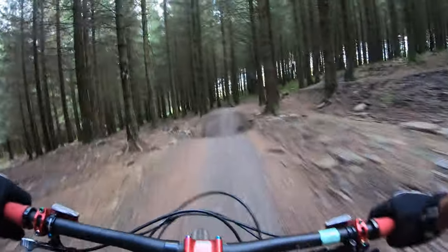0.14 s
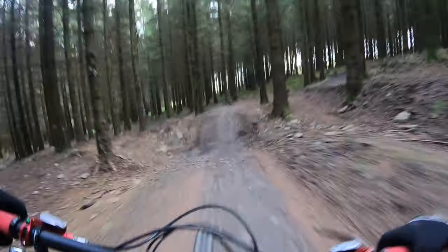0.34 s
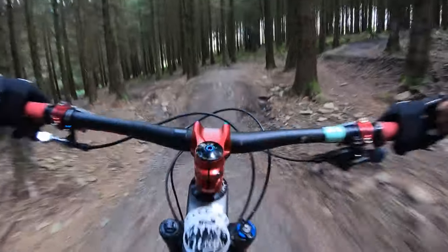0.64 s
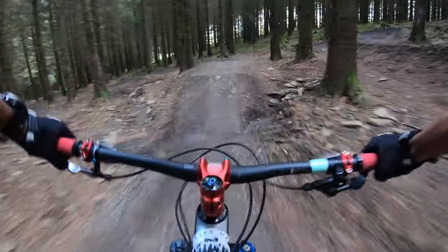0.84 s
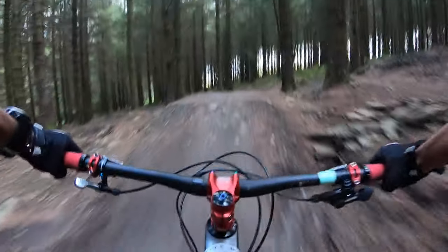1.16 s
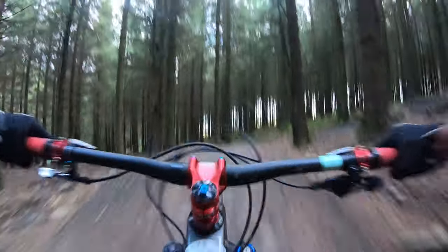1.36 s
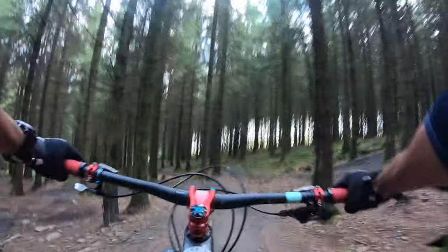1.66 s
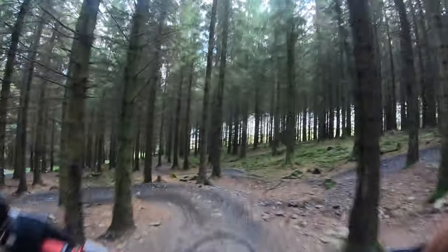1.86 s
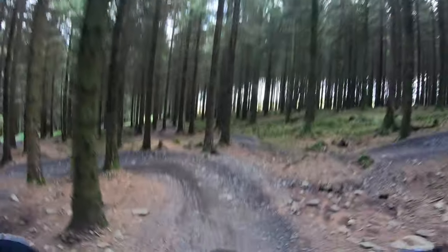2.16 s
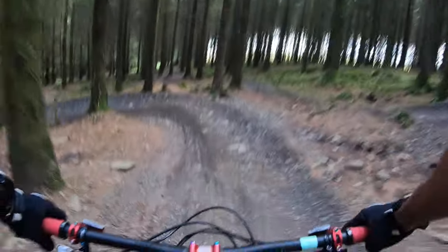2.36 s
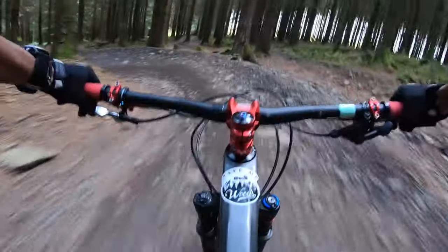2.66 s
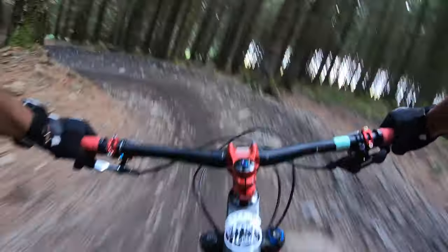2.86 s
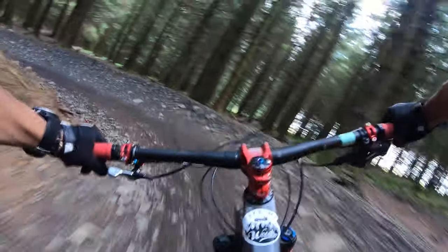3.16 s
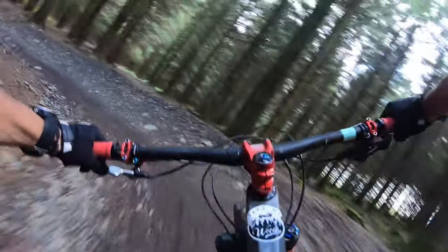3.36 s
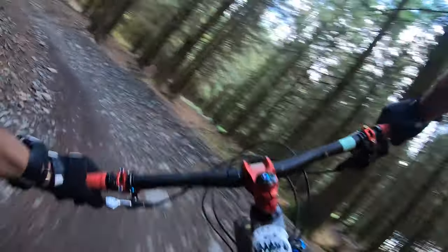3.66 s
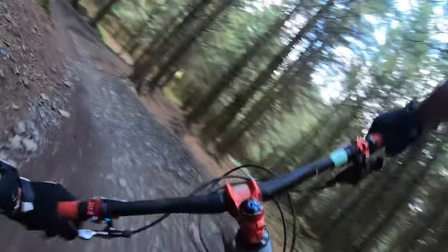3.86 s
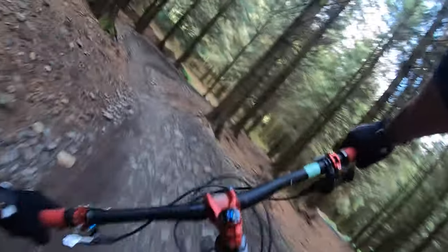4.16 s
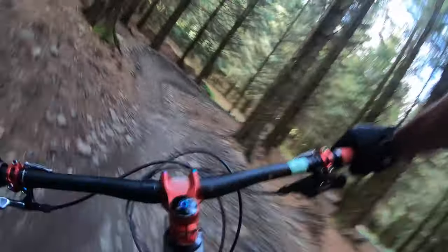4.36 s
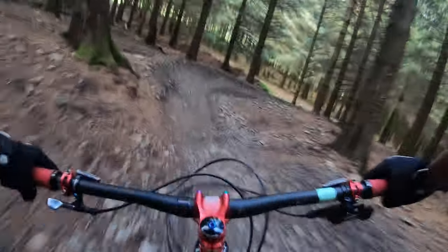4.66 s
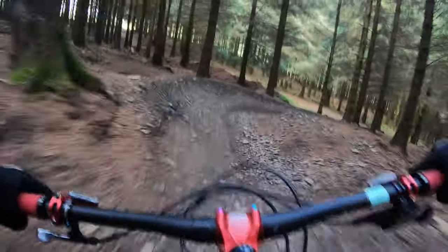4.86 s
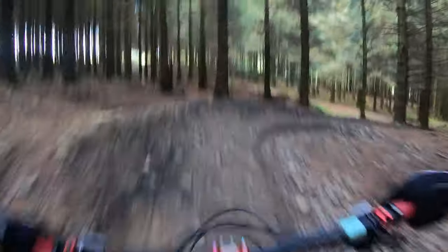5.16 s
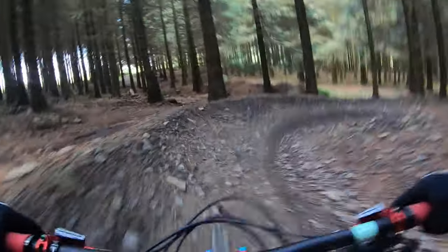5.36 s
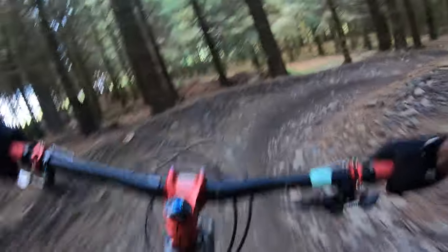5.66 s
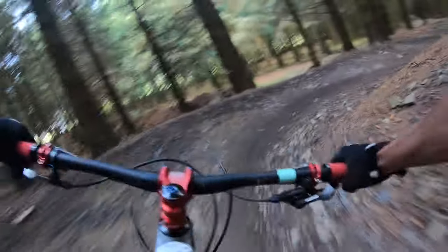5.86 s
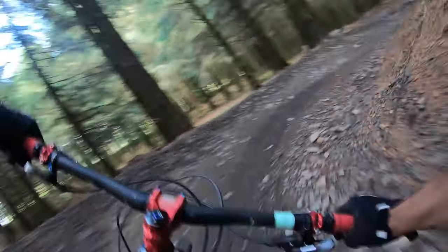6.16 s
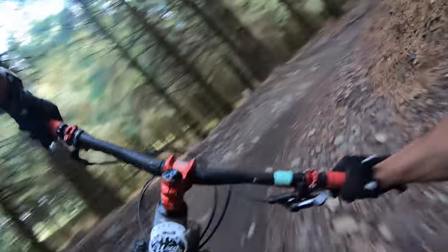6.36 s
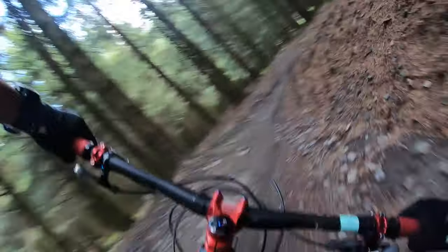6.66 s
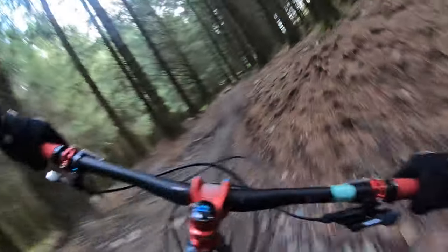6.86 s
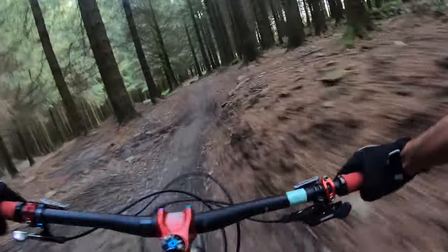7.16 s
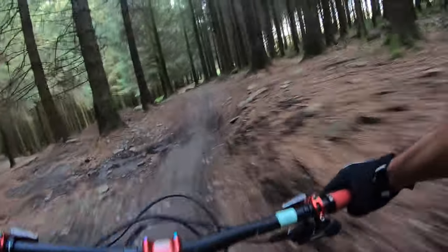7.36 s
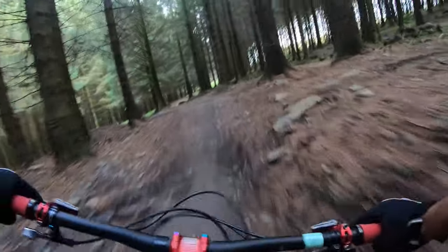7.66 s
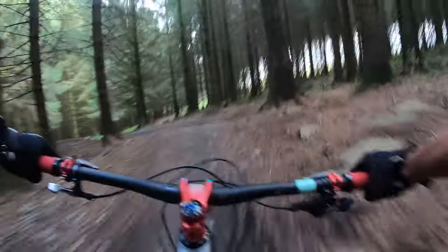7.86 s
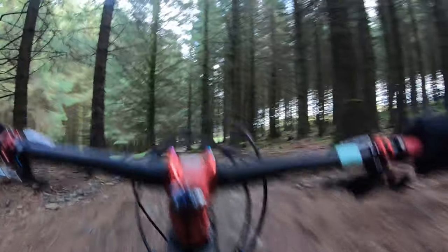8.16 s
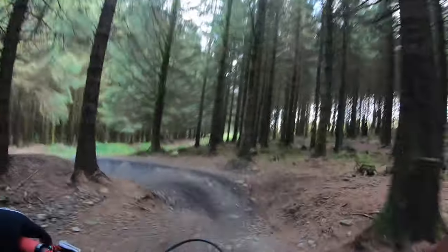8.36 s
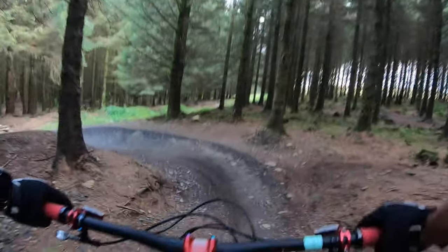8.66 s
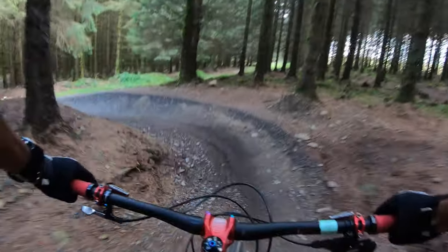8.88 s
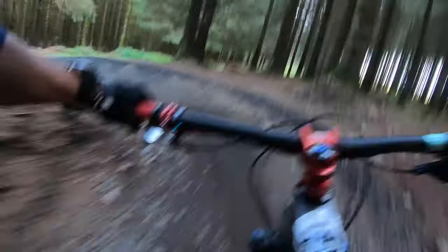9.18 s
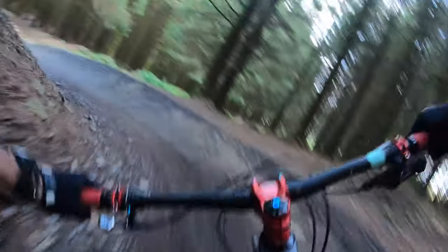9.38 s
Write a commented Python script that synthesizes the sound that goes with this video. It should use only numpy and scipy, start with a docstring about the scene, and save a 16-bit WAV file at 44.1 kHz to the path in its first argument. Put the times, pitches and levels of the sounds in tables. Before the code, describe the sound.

A mountain bike coasts down a stony forest trail, heard from the rider's chest. Tyres hum and crunch, the freehub buzzes, the chain rattles and flung stones crack against the frame. The tyres go quiet over a jump, then land with a thump, followed by thin, high brake squeaks. A rougher stretch of knocks leads to two more jumps and a hard landing. Wind buffets the microphone throughout.

```python
"""On a stony trail, a mountain bike coasts downhill, heard from a camera on the rider's chest.
The tyres hum and crunch gravel, and go quieter over jumps. Bumps knock the frame and rattle the chain,
flung stones crack against the bike and thin metal rings on. The freehub (the rear wheel's ratchet)
buzzes, and before a bend a brake disc squeaks each time a cut-out passes the pads.
Wind buffets the microphone all the way."""
import sys
import numpy as np
from scipy import signal
from scipy.io import wavfile
from scipy.ndimage import uniform_filter1d

SR = 44100
rng = np.random.default_rng(int(sys.argv[2]) if len(sys.argv) > 2 else 0)


def wrap_up_sound(samples):
    """Save the sound to the file named by the first command line argument, as 16-bit audio."""
    columns = np.atleast_2d(samples).T
    # keep every value between -1 and 1, then stretch to whole-number steps
    tamed = np.clip(columns, -1, 1)
    steps = np.round(tamed * 32767).astype(np.int16)
    wavfile.write(sys.argv[1], SR, steps)


N = 419832

# The trail under the tyres (time [s], tyre load [dB], loose gravel [dB])
TRAIL = [(0, -25.5, -29.5), (.18, -21.5, -28.5), (.45, -27, -33), (.64, -29, -32), (.75, -33.5, -34.5),
         (1.03, -25, -30), (1.22, -16.5, -25), (1.35, -17, -25.5), (1.51, -15, -22), (1.65, -22.5, -26.5),
         (2.54, -20.5, -19), (2.68, -16, -24), (2.82, -20, -26), (2.9, -32.5, -30.5), (3.0, -25.5, -31),
         (3.2, -27, -29), (3.35, -19.5, -30), (3.47, -26.5, -30), (3.56, -20, -28.5), (3.68, -28, -31),
         (3.85, -19.5, -30), (3.98, -21.5, -31), (4.05, -23, -25), (4.11, -22.5, -32), (4.17, -30.5, -31.5),
         (4.32, -20.5, -32.5), (4.6, -23.5, -32.5), (4.85, -26.5, -32.5), (5.0, -28, -33.5),
         (5.27, -18.5, -24), (5.36, -20.5, -27), (5.45, -20, -27), (5.72, -22, -29.5), (5.8, -21, -28),
         (5.87, -26, -31.5), (6.0, -22, -27.5), (6.1, -18.5, -29.5), (6.2, -18, -24.5), (6.3, -17, -27.5),
         (6.4, -19.5, -29.5), (6.48, -22, -31.5), (6.58, -24, -29), (6.7, -21, -28.5), (7.22, -27, -31.5),
         (7.4, -18, -27.5), (7.7, -26.5, -29.5), (7.8, -26, -31.5), (7.97, -30, -35), (8.1, -23.5, -31.5),
         (8.4, -28.5, -31.5), (9.1, -20, -20), (9.3, -22.5, -31), (9.52, -17, -30)]
# Packed or stony ground (time [s], tyre air ring [Hz], ring over load [dB], grit over gravel [dB])
SURFACE = [(0, 266, -1, -9), (.2, 271, 6, -15), (.45, 276, 2, -15), (.8, 272, 6.5, -7),
           (1.2, 267, -1.5, -12), (1.35, 279.5, -6.5, -17), (1.55, 271.5, 0, -17.5), (2.7, 268.4, 0, -11),
           (2.88, 254, 7.5, -9), (3.05, 279, 2, -8.5), (3.3, 265, 4, -7.5), (3.6, 264, -1, -7),
           (3.93, 274, 0.5, -8), (4.03, 266, 0, -5.5), (4.3, 262, 0.5, -17), (5.0, 268, 2.5, -8),
           (5.33, 270, -3, -8.5), (5.45, 259, -6, -12.5), (5.83, 270, 0, -6), (6.15, 267, -8.5, -10.5),
           (6.4, 268, 1, -7), (6.8, 253.6, 4.5, -7), (7.35, 262, -9.5, -11), (7.8, 255, 7.5, -6.5),
           (8.3, 252, 4.5, -8), (9.2, 275, -0.5, -12.5), (9.52, 268, -10, -4.5)]
# More tyre tones
# (time [s], tread whir [Hz], whir over gravel [dB], upper ring over load [dB], drumming over load [dB])
TYRE_TONES = [(0, 1080, -16, -4, -24), (.3, 1140, -7, -6, -24), (.6, 1170, -15, -5, -13),
              (.75, 915, -20, -11, -18), (.9, 920, -7.5, -10, -11), (1.2, 990, -13, -8.5, -21),
              (1.6, 990, -18, -12, -25), (2.4, 960, -4, 2, -7), (2.6, 940, -27, -13, -7.5),
              (2.9, 830, -10, -11, -12), (3.2, 820, -12, -11, -26), (3.7, 865, -14, -7, -8),
              (4.1, 930, -15, -19, -5), (4.7, 825, -14, -9.5, -8.5), (5.2, 1020, -18, -12, -8),
              (5.7, 870, -25, -12.5, -13), (6.2, 880, -12, -13, -15), (6.7, 810, -14, -10, -2.5),
              (7.3, 950, -24, -15, -12.5), (7.9, 910, -12, -6, -7.5), (8.4, 950, -13, -4.5, -5),
              (9.2, 950, -32, -8, -11), (9.52, 920, -14, -22, -16)]
# Wheels off the ground (lift-off [s], landing [s], change in tyre noise [dB])
JUMPS = [(1.63, 2.578, -22), (6.79, 7.23, -8.5), (8.407, 9.148, -18)]
# The low roar of rolling (frequency [Hz], level [dB])
ROAR_SPECTRUM = [(90, -16), (160, -25.5), (220, -2.5), (330, 9), (420, -4), (600, -6.5), (1000, -61.5)]
# Crunching gravel (frequency [Hz], level [dB])
GRAVEL_SPECTRUM = [(400, -1), (700, -1.5), (950, -7), (1250, -6), (1700, -6), (2100, -5), (2900, -7.5),
                   (4000, -28.5), (6000, -36.5)]
# Fine, crackling grit (frequency [Hz], level [dB])
GRIT_SPECTRUM = [(2200, -7), (3100, 8.5), (3900, 8.5), (4700, 4.5), (5700, 0), (6150, -7), (8400, -6),
                 (9500, -14.5), (11000, -7), (15500, -4)]
# Tyre and fork take a blow (time [s], level [dB], pitch [Hz], base time to fade by 60 dB [s])
THUMPS = [(.746, -42, 275, .047), (2.532, -8.5, 290, 0.066), (2.55, -6, 177, 0.044),
          (2.917, -10.5, 276, 0.068), (3.846, -8, 262, 0.11), (3.938, -5, 300, 0.031),
          (4.053, -9.5, 276, 0.069), (4.184, -8.5, 320, 0.09), (5.01, -8.5, 290, 0.063),
          (5.087, -6.5, 215, 0.054), (5.193, 1.5, 284, 0.035), (5.391, -6, 228, 0.042),
          (5.924, -10, 285, 0.024), (5.978, 1.5, 258, 0.017), (6.124, -3.5, 336, 0.046),
          (6.147, -11, 273, 0.086), (6.18, -5.5, 268, 0.069), (6.224, 0, 260, 0.025),
          (6.662, -4, 250, 0.032), (7.228, -10.5, 262, 0.041), (8.305, -12, 314, 0.057),
          (9.097, -20, 363, 0.042), (9.121, 1, 228, 0.018)]
# Chain, cables and frame clack (time [s], level [dB], pitch [Hz])
CLACKS = [(0.304, -24, 2350), (.472, -28, 1160), (.704, -26, 2700), (0.854, -28, 2400), (1.053, -28, 920),
          (1.167, -20.5, 1680), (1.209, -16.5, 930), (1.215, -13.5, 2550), (1.342, -18, 1570),
          (1.57, -29, 2240), (1.641, -20, 2600), (1.669, -24.5, 1710), (1.78, -24, 2250), (2.201, -22, 780),
          (2.327, -24, 920), (2.535, -15.5, 1100), (2.551, -13, 1550), (2.594, -9.5, 2430),
          (2.627, -14.5, 2470), (2.919, -20, 800), (2.921, -17, 1910), (2.953, -16, 1560),
          (2.978, -16.5, 1630), (3.05, -19.5, 784), (3.083, -23, 1470), (3.148, -19, 1910),
          (3.215, -16, 834), (3.215, -16.5, 1860), (3.262, -30, 1730), (3.328, -28, 1720),
          (3.396, -25, 1640), (3.488, -31, 1690), (3.702, -24, 1840), (3.836, -31, 816), (3.881, -22, 1710),
          (3.989, -26, 1360), (4.021, -16, 990), (4.039, -18, 1420), (4.076, -15.5, 1590),
          (4.123, -25, 1700), (4.281, -26, 1490), (4.356, -35, 1540), (4.406, -20, 1520),
          (4.491, -29, 1630), (4.665, -28, 1690), (4.788, -20.5, 720), (4.785, -18, 1670),
          (4.823, -23, 2140), (4.99, -27, 2480), (5.048, -20, 2000), (5.089, -21, 1760), (5.152, -17, 1500),
          (5.194, -19, 1440), (5.226, -21, 1370), (5.243, -15, 2080), (5.269, -13.5, 1710),
          (5.287, -16.5, 1245), (5.311, -13, 2460), (5.333, -16, 1640), (5.412, -28, 1250),
          (5.435, -18, 1010), (5.464, -31, 1650), (5.474, -17, 1690), (5.494, -19, 2500),
          (5.538, -19, 2590), (5.566, -17, 2530), (5.625, -20, 1750), (5.713, -19, 2260),
          (5.734, -20, 2310), (5.786, -17, 1670), (5.83, -13.5, 2460), (5.884, -31, 2540),
          (5.928, -9.5, 2374), (5.962, -14, 2330), (6.024, -16, 2240), (6.074, -19, 2400),
          (6.089, -16.5, 2220), (6.125, -10, 2140), (6.18, -21, 2150), (6.239, -16, 685),
          (6.239, -16, 2120), (6.313, -25, 1560), (6.525, -23, 2100), (6.594, -17.5, 2170),
          (6.718, -15.5, 660), (6.853, -25, 2960), (7.229, -17.5, 780), (7.337, -20, 1810),
          (7.358, -19, 2280), (7.391, -14, 950), (7.55, -19, 890), (7.666, -15.5, 650), (7.666, -18, 2460),
          (7.761, -20, 1000), (8.184, -19.5, 2420), (8.221, -20.5, 2420), (8.428, -22.5, 2880),
          (9.096, -29, 2430), (9.121, -16, 915), (9.138, -9.5, 2790), (9.153, -14, 2520),
          (9.156, -15, 1750), (9.252, -29, 1780), (9.293, -18, 1630), (9.384, -32, 1620)]
# Stones hit frame and wheels (time [s], crack level [dB], crack pitch [Hz], knock level [dB])
STONE_HITS = [(.5386, -38, 5000, -40), (.6433, -35, 5400, -38), (.8149, -36, 5020, -41),
              (0.856, -31, 5800, -40), (.9551, -32, 5770, -40), (1.025, -36, 4550, -41),
              (1.078, -29, 5540, -36), (1.0899, -24, 6600, -24), (1.1248, -27, 5800, -42),
              (1.1861, -33, 5600, -38), (1.2145, -32, 7500, -31), (1.3148, -32, 5400, -28),
              (1.3389, -20, 5720, -36), (1.4111, -36, 5340, -40), (1.6347, -28, 5470, -31),
              (1.7804, -48, 5300, -32), (2.5575, -30, 4600, -33), (2.5691, -29, 5220, -38),
              (2.596, -26, 5700, -24), (2.6249, -23, 5400, -18), (2.6494, -19, 7500, -38),
              (2.9204, -29, 5050, -24), (2.9397, -30, 5470, -32), (3.0928, -33, 5210, -36),
              (3.1702, -29, 5800, -30), (3.2154, -34, 5570, -33), (3.5098, -35, 4600, -36),
              (3.7329, -31, 6020, -30), (3.8754, -29, 5310, -35), (3.9209, -29, 4910, -32),
              (3.9686, -19, 8700, -44), (4.025, -21, 8270, -29), (4.031, -18, 5750, -18),
              (4.0547, -21, 5780, -23), (4.0766, -25, 5880, -21), (4.0886, -21, 8300, -38),
              (4.1215, -28, 5680, -33), (4.2098, -29, 5700, -30), (4.2557, -44, 5150, -39),
              (4.2964, -37, 8500, -29), (4.3166, -31, 5840, -27.5), (4.3545, -43, 5410, -35),
              (4.4052, -39, 5000, -32), (4.4367, -29, 5500, -29), (4.4623, -36, 5580, -32),
              (4.49, -30, 7800, -34), (4.5077, -30, 5180, -39), (4.5511, -38, 5210, -46),
              (4.6846, -37, 5330, -42), (4.784, -35, 6000, -19), (4.8219, -31, 5140, -36),
              (4.8474, -34, 5380, -41), (4.9495, -35, 4600, -36), (5.032, -24, 5300, -28),
              (5.0494, -36, 5090, -24), (5.0955, -25.5, 5570, -40), (5.1514, -38, 5370, -30),
              (5.175, -26, 5450, -33), (5.216, -36, 9300, -43), (5.2264, -32, 4790, -33),
              (5.2465, -17, 5500, -27), (5.278, -21, 5040, -22), (5.3132, -19, 5000, -26),
              (5.3284, -20, 5450, -21), (5.3502, -25, 5280, -42), (5.4136, -20.5, 5600, -28),
              (5.457, -23, 5140, -32), (5.4734, -24, 5010, -27), (5.5148, -26, 4940, -26),
              (5.5296, -26, 5940, -35), (5.7188, -32, 4660, -25), (5.7838, -37, 5160, -35),
              (5.826, -39, 5360, -20), (5.8774, -33, 4920, -36), (5.9025, -29, 5730, -27),
              (5.928, -40, 5110, -28), (5.961, -41, 5180, -34), (5.9953, -30, 5540, -27),
              (6.0241, -33, 4600, -30), (6.0377, -22, 5360, -22), (6.065, -29, 4860, -34),
              (6.1355, -39, 5740, -24), (6.1814, -25, 5220, -21), (6.2133, -27, 5820, -32),
              (6.2397, -29, 5350, -20), (6.254, -30, 5400, -30), (6.3284, -35, 4850, -25),
              (6.3726, -39, 5500, -26), (6.5934, -28, 5590, -22), (6.6243, -29, 5700, -24),
              (6.6846, -35, 4900, -31), (6.7186, -44, 5000, -21), (6.8518, -42, 5050, -30),
              (7.0533, -40, 4760, -38), (7.252, -29, 5500, -31), (7.3047, -36, 4640, -39),
              (7.3587, -27, 5560, -29), (7.391, -32, 4600, -32), (7.5496, -27, 4820, -29),
              (7.594, -33, 4610, -36), (7.666, -43, 5000, -21), (8.1248, -33, 5240, -36),
              (8.1538, -32, 5420, -36), (8.1836, -19, 5980, -38), (8.2212, -27, 5640, -35),
              (8.268, -36, 8000, -38), (9.1172, -32, 5470, -35), (9.137, -20, 7040, -17),
              (9.183, -29, 5050, -24), (9.2089, -26, 4600, -22), (9.2518, -36, 4600, -28)]
# The crack of a stone (frequency [Hz], level [dB])
CRACK_SPECTRUM = [(3000, -31), (5200, 1), (5800, -10), (7000, -11), (9300, 5), (11000, -2), (15500, 7.5)]
# How loudly the freehub buzzes (time [s], level [dB])
HUB_LEVELS = [(0, -34), (.4, -41.5), (.85, -35.5), (1.5, -32), (1.7, -35.5), (1.76, -44), (1.85, -37.5),
              (1.95, -40), (2.07, -42), (2.2, -40.5), (2.28, -38), (2.4, -35.5), (2.46, -34), (2.54, -34),
              (2.6, -29), (2.69, -26), (2.75, -38), (2.85, -43), (3.6, -62), (4.4, -59), (5.05, -32),
              (5.2, -48), (5.32, -36), (5.4, -48), (5.6, -40), (5.8, -35), (5.87, -36), (5.95, -29),
              (6.1, -37), (6.22, -37), (6.42, -34), (6.5, -53), (6.75, -33.5), (7.0, -43.5), (7.65, -35.5),
              (8.25, -36), (8.52, -40), (8.65, -45), (8.7, -37), (8.78, -39), (8.81, -32), (8.87, -35),
              (8.94, -31.5), (9.0, -34), (9.03, -43), (9.09, -30), (9.52, -41)]
# The tones of the hub's shell (base pitch [Hz], width [Hz], level [dB])
HUB_TONES = [(1780, 600, -10.5), (2500, 210, 6.5), (2910, 37, 1), (4700, 890, -25)]
# The second shell tone drifts, and the others move with it (time [s], pitch [Hz])
HUB_PITCH = [(0, 2520), (1.7, 2510), (2.0, 2520), (2.2, 2660), (2.4, 2560), (2.55, 2420), (2.75, 2440),
             (5.0, 2480), (5.95, 2450), (6.05, 2280), (6.2, 2180), (6.45, 2100), (6.6, 2450), (7.0, 2560),
             (8.3, 2470), (8.6, 2660), (8.8, 2530), (9.0, 2560), (9.1, 2530), (9.52, 2460)]
# Brake squeaks (time [s], level [dB])
SQUEAKS = [(2.646, -30), (2.674, -31), (2.715, -29), (2.751, -26), (2.793, -29), (2.834, -26), (2.872, -27),
           (2.917, -32), (3.001, -45), (3.03, -39), (3.078, -46), (3.114, -48), (3.148, -41), (3.19, -35),
           (3.23, -38), (3.27, -37), (3.311, -31), (3.349, -25), (3.39, -34), (3.431, -29), (3.474, -29),
           (3.515, -34), (3.563, -27), (3.601, -22.5), (3.652, -23.5), (3.704, -21.5), (3.753, -34),
           (3.774, -44), (3.796, -45)]
# The high tones of the brake disc (base pitch [Hz], width [Hz], level [dB])
DISC_TONES = [(12420, 580, 3.5), (12060, 500, -6)]
# Thin metal rings on after a knock (time [s], pitch [Hz], level [dB], time to fade by 60 dB [s])
SPOKE_RINGS = [(1.34, 9220, -50, .9), (1.34, 5700, -52, .9), (3.955, 9250, -45, 0.84),
               (4.03, 5630, -46, 1.6), (4.09, 9600, -63, 1.5), (4.21, 5650, -53, 1.2),
               (4.32, 5660, -53, 1.1), (4.44, 9400, -56, 1.2), (5.22, 9250, -49, 1.5),
               (5.32, 9250, -57, 1.5), (5.53, 9250, -58, 1.2), (5.76, 9250, -58, .6)]
# Gusts on the microphone (time [s], level [dB])
GUST_LEVELS = [(0, -27), (.64, -32), (.85, -21.5), (1.25, -28), (1.7, -22), (1.9, -28.5), (2.03, -32),
               (2.15, -38), (2.35, -32), (2.62, -27), (3.45, -28.5), (4.0, -29.5), (4.9, -29), (5.2, -28),
               (5.45, -23), (5.7, -26), (5.83, -25), (5.99, -34), (6.08, -20), (6.13, -20), (6.2, -21.5),
               (6.5, -28.5), (7.16, -33.5), (7.35, -27.5), (7.9, -31.5), (8.15, -30), (8.48, -30),
               (8.6, -34.5), (8.9, -32.5), (9.07, -36), (9.13, -15.5), (9.25, -29), (9.52, -29)]
# The rumble of those gusts (frequency [Hz], level [dB])
GUST_SPECTRUM = [(15, 3.5), (30, 2.5), (64, -4.5), (110, -10.5), (230, -13.5), (500, -60), (1200, -67)]
# Air rushing past the rider (frequency [Hz], level [dB])
RUSH_SPECTRUM = [(350, -33.5), (600, 5.5), (1400, -10.5), (3700, -6), (5600, -13.5), (6100, -20),
                 (10500, -22.5), (12000, -25.5), (15600, -29)]
# The camera case dulls the bike's treble (frequency [Hz], gain [dB])
CASE_FILTER = [(15, 0.5), (10000, -3.5), (11200, -15), (15500, -23.5)]
# Sound that is unlike at the left and right microphone openings (frequency [Hz], gain [dB])
STEREO_FILTER = [(8000, -72), (10600, -49), (11600, -0.5), (15500, 3)]


def tyre_hum(bumps):
    """Bumps shake the air inside the tyres: it rings and roars, while fork and frame drum below."""
    load_db, jump_db = curves(TRAIL)[0], airborne()
    ring_hz, ring_db, _ = curves(SURFACE)
    _, _, upper_db, drum_db = curves(TYRE_TONES)
    ruts = wobble(24)
    shake = bursts(per_s=120, spread_db=3.5, fade_s=0.0067, hiss=4.2)
    ring = band(shake, ring_hz, 26.3, 165) * gain(ring_db + 0.1 * bumps + 0.29 * ruts)
    upper_ring = band(shake, 1.394 * ring_hz, 39, 170) * gain(upper_db)
    roar = unit_level(filtered(shake, ROAR_SPECTRUM)) * gain(-4.5 + 1.3 * bumps + 1.8 * ruts)
    drum = band(shake, 177.6, 33.5, 33.5) * gain(drum_db)
    hum = (ring + upper_ring) * gain(load_db + jump_db)
    return hum + (roar + drum) * gain(load_db + 0.76 * jump_db)  # these two drop less in a jump


def gravel_crunch(bumps):
    """The tread whirs as its knobs crush gravel and grit, louder on each bump."""
    loose_db, grit_db, jump_db = curves(TRAIL)[1], curves(SURFACE)[2], airborne()
    whir_hz, whir_db, _, _ = curves(TYRE_TONES)
    crunch = bursts(per_s=240, spread_db=1.5, fade_s=0.028, hiss=1.26)
    crackle = bursts(per_s=270, spread_db=5, fade_s=0.0037, hiss=6)
    gravel = unit_level(filtered(crunch, GRAVEL_SPECTRUM))
    whir = band(crunch, whir_hz, 170, 360) * gain(whir_db)
    grit = unit_level(filtered(crackle, GRIT_SPECTRUM))
    patches = wobble(32)  # loose and packed ground take turns
    grit *= gain(loose_db + 0.68 * jump_db + grit_db + 1.7 * bumps + 0.67 * patches)
    return (gravel + whir) * gain(loose_db + jump_db + 1.42 * bumps + 0.14 * patches) + grit


def knocks(rows, tones, noise_share, noise_width, rise_s):
    """A struck part rings and gives a puff of noise. Tones are (pitch multiple, level [dB])."""
    out, t = np.zeros(N + SR), np.arange(SR // 5) / SR
    mean_hz = np.mean(rows, 0)[2]
    for time, db, hz, fade_s in rows:
        ring = sum(gain(tone_db) * np.sin(2 * np.pi * hz * ratio * t) for ratio, tone_db in tones)
        puff = band(rng.standard_normal(len(t)), hz, noise_width * hz, 1.96 * noise_width * hz)
        stretch = (mean_hz / hz) ** 0.038  # lower parts start and die more slowly
        fade_db = -60 * t / (fade_s * stretch)
        rise = 1 - np.exp(-t / (rise_s * stretch ** 2))
        puff = shaped(puff, gain(fade_db / 2.18))  # the noise outlasts the ring
        knock = (1 - noise_share) * ring * gain(fade_db) + noise_share * puff
        add_at(out, time, gain(db) * rise * knock)
    return out[:N]


def stones():
    """Each flung stone gives a sharp crack, with a duller knock from the tube it hits."""
    at = np.flatnonzero(rng.random(N) < 3 / SR)  # about 3 extra pebbles a second
    size_db = 3.5 * rng.standard_normal((N, 2))[at]
    loose_db = (curves(TRAIL)[1] + airborne())[at]
    pebble_hz = rng.uniform(5000, 9500, N)[at]
    pebbles = np.c_[at / SR, loose_db - 25 + size_db[:, 0], pebble_hz, loose_db - 3 + size_db[:, 1]]
    out, t = np.zeros(N + SR), np.arange(3000) / SR
    for time, crack_db, hz, knock_db in [*STONE_HITS, *pebbles]:
        crack_noise, knock_noise = rng.standard_normal((2, len(t)))
        snap = unit_level(filtered(crack_noise, CRACK_SPECTRUM)[:len(t)])
        crack = 0.55 * snap + 0.45 * band(crack_noise, hz, 540, 920)
        knock = unit_level(resonate(resonate(knock_noise, 3800, 1150), 1900, 920))
        knock *= 1 - np.exp(-t / 0.00034)
        add_at(out, time, shaped(crack, gain(crack_db - 60 * t / 0.016)))
        add_at(out, time, shaped(knock, gain(knock_db - 60 * t / 0.048)))
    return out[:N]


def chain():
    """Quick, uneven taps ring a plastic part, as hard as the gravel shakes the bike."""
    brake_on_s, brake_off_s, slack_db = 2.65, 3.74, 7.2  # braking slackens the chain: more rattle
    ramp_s = [brake_on_s - 0.1, brake_on_s, brake_off_s, brake_off_s + 0.3]
    boost_db = np.interp(np.arange(N) / SR, ramp_s, [0, slack_db, slack_db, 0])
    taps = bursts(per_s=160, spread_db=1.5, fade_s=0.0096, hiss=0.96)
    rattle = unit_level(resonate(resonate(taps, 1697, 210), 1530, 420))
    return rattle * gain(curves(TRAIL)[1] + 0.94 * airborne() - 10 + boost_db)


def freehub():
    """Small catches (pawls) drop over the ratchet teeth slightly out of step and ring the hub shell."""
    clicks_per_s, spread_db = 120, 2.3
    teeth_passed = np.cumsum(clicks_per_s * (1 + 0.09 * wobble(150))) / SR
    new_tooth = np.diff(np.floor(teeth_passed), prepend=0) > 0
    clicks = new_tooth * gain(spread_db * rng.standard_normal(N))
    tails = signal.lfilter([1], [1, -np.exp(-1 / (0.019 * SR))], clicks)  # each pawl rattles on
    drive = unit_level(clicks) + 1.3 * unit_level(tails * rng.standard_normal(N))
    drift = curves(HUB_PITCH)[0] / HUB_TONES[1][0] * (1 + 0.007 * wobble(27))
    ring = sum(gain(db) * resonate(resonate(drive, hz * drift, width), hz * drift, 5.1 * width)
               for hz, width, db in HUB_TONES)
    return unit_level(ring) * gain(curves(HUB_LEVELS)[0])


def brake():
    """The pads stick and slip on the disc, ringing its high tones in short swells, louder on the left."""
    squeak_s, firm_db, left_over_right_db = 0.041, -30, 6.5
    out, t = np.zeros((2, N)), np.arange(4000) / SR
    swell = np.sin(np.pi * np.minimum(t / squeak_s, 1) ** 0.75) ** 2  # rises faster than it fades
    swell += 0.05 * np.exp(-t / 0.04) * (1 - np.exp(-t / 0.004))  # a faint tail
    for time, db in SQUEAKS:
        soft_db = max(firm_db - db, 0)
        shift_hz = -200 * (time - SQUEAKS[0][0]) - 23 * soft_db  # later and softer squeaks are lower
        left, other = rng.standard_normal((2, len(t)))
        for side, noise in enumerate([left, 0.42 * left + 2.9 * other]):
            high = 0
            for hz, width, tone_db in DISC_TONES:
                ring = noise
                for _ in range(3):  # each pass makes the tone purer
                    ring = resonate(ring, hz + shift_hz, width)
                high += gain(tone_db) * ring
            # a lower tone comes out when the pads barely grip
            low = gain(-25.5 + 1.47 * soft_db) * band(noise, 11340, 300, 300)
            level = gain(db + (0.5 - side) * left_over_right_db) / 2
            add_at(out[side], time - 0.007, level * swell * (unit_level(high) + low))
    return out


def spokes():
    """Thin metal rings on: a narrow band of noise that swells at once and dies slowly."""
    out, t = np.zeros(N + SR), np.arange(SR) / SR
    for time, hz, db, fade_s in SPOKE_RINGS:
        ring = band(rng.standard_normal(SR), hz, 550, 550)
        add_at(out, time, ring * gain(db - 60 * t / fade_s) * (1 - np.exp(-t / 0.01)))
    return out[:N]


def wind():
    """Gusts rumble on the microphone while air rushes faintly past the rider."""
    gusts = unit_level(filtered(rng.standard_normal(N), GUST_SPECTRUM))
    gusts *= gain(curves(GUST_LEVELS)[0] + 0.84 * wobble(58) + 2 * wobble(14))
    rush = unit_level(filtered(rng.standard_normal(N), RUSH_SPECTRUM))
    return gusts + rush * gain(-47.5 - 2 * wobble(29))


def airborne():
    """The dip in tyre noise during jumps, in dB: weight comes off slowly and returns quickly."""
    t, lift_s, land_s = np.arange(N) / SR, 0.21, 0.072
    return sum(db * np.clip(np.minimum((t - up) / lift_s, (down - t) / land_s), 0, 1)
               for up, down, db in JUMPS)


def gain(db):
    """Turns decibels into a number to multiply by."""
    return 10 ** (np.asarray(db) / 20)


def unit_level(x):
    """Scales a signal to an average (rms) level of 1."""
    return x / np.sqrt(np.mean(x ** 2) + 1e-20)


def curves(rows):
    """Turns each column after the time into a value for every sample."""
    times, *columns = np.transpose(rows)
    return [np.interp(np.arange(N) / SR, times, column) for column in columns]


def filtered(x, spectrum):
    """Gives a sound the listed spectrum, with no ringing ahead of a hit."""
    hz, db = np.transpose(spectrum)
    bin_hz = abs(np.fft.fftfreq(8192, 1 / SR))
    log_gain = np.log(gain(np.interp(np.log(bin_hz + 1), np.log(hz + 1), db, left=db[0] - 38)))
    phase = -signal.hilbert(log_gain).imag
    taps = np.fft.ifft(np.exp(log_gain + 1j * phase)).real[:4096]
    return signal.oaconvolve(x, taps)[:N]


def resonate(x, hz, width_hz):
    """Rings at a steady or moving pitch: shifts that pitch down to zero, smooths, and shifts back."""
    turn = np.exp(2j * np.pi * np.cumsum(hz * np.ones(len(x))) / SR)
    decay = np.exp(-np.pi * width_hz / SR)
    return 2 * (turn * signal.lfilter([1 - decay], [1, -decay], x / turn)).real


def band(x, hz, first_width_hz, second_width_hz):
    """Keeps the sound near one pitch by ringing it twice, then sets its level to 1."""
    return unit_level(resonate(resonate(x, hz, first_width_hz), hz, second_width_hz))


def wobble(per_s):
    """A smooth random curve of level 1 that changes about per_s times a second."""
    size = int(SR / per_s)
    return unit_level(uniform_filter1d(uniform_filter1d(rng.standard_normal(N), size), size))


def bursts(per_s, spread_db, fade_s, hiss):
    """A steady hiss that flares up in short bursts of uneven size."""
    sizes = gain(spread_db * np.minimum(rng.exponential(1, N), 5))
    starts = rng.random(N) < per_s / SR
    flares = signal.lfilter([1], [1, -np.exp(-np.log(1000) / (fade_s * SR))], sizes * starts)
    return (hiss + unit_level(flares)) * rng.standard_normal(N)


def shaped(noise, envelope):
    """Makes noise follow a loudness curve and carry that curve's energy."""
    return unit_level(noise * envelope) * np.sqrt(np.mean(envelope ** 2))


def add_at(out, time, sound):
    """Mixes in a sound at a time in seconds."""
    out[round(time * SR):][:len(sound)] += sound


def scene():
    """Bike and wind sound alike left and right, except for the brake and the highest treble."""
    thumps = knocks(THUMPS, [(1, 4.5), (1.5, -29)], noise_share=0.31, noise_width=0.8, rise_s=0.0016)
    clack_fade_s, clack_tones = 0.032, [(0.62, -6.5), (1, 7), (1.55, -4), (2.3, -22)]
    clack_rows = [(*row, clack_fade_s) for row in CLACKS]
    clacks = knocks(clack_rows, clack_tones, noise_share=0.52, noise_width=0.47, rise_s=0.0006)
    bumps = wobble(60)  # the same bumps drive the hum and the crunch
    tyres = tyre_hum(bumps) + gravel_crunch(bumps)
    bike = tyres + thumps + clacks + chain() + freehub() + stones() + spokes()
    centre = filtered(bike, CASE_FILTER) + wind()
    scatter = rng.standard_normal(900) / np.sqrt(900)  # smears the sound over about 20 ms
    side = filtered(signal.oaconvolve(centre, scatter)[:N], STEREO_FILTER)
    return np.array([centre + side, centre - side]) + brake()


def record(dry):
    """The hardest blows overload softly, then treble above 15750 Hz is cut."""
    soft = 0.75 * np.tanh(dry / 0.76)
    low_pass = signal.firwin(511, 15750, window=("kaiser", 9), fs=SR)
    return signal.oaconvolve(soft, low_pass[None], "same")


dry = scene()
out = record(dry)
wrap_up_sound(out)
```